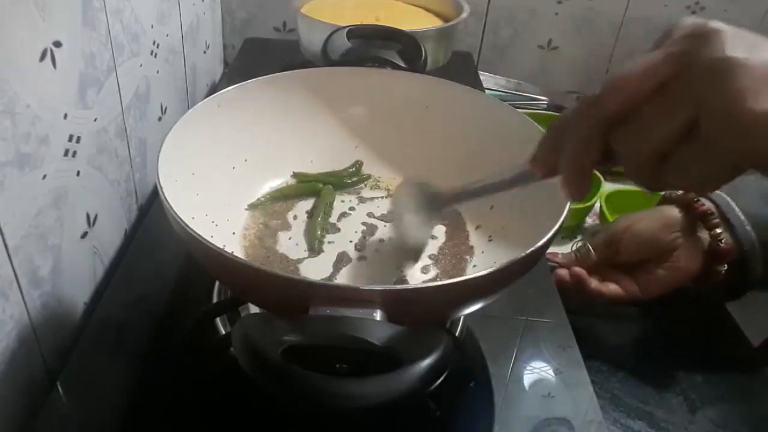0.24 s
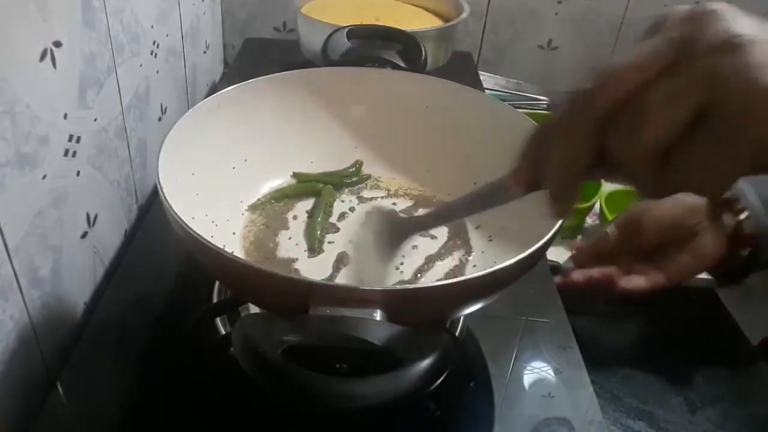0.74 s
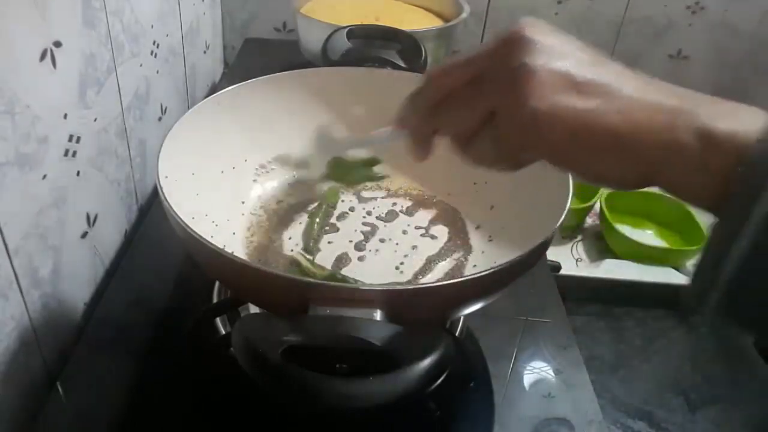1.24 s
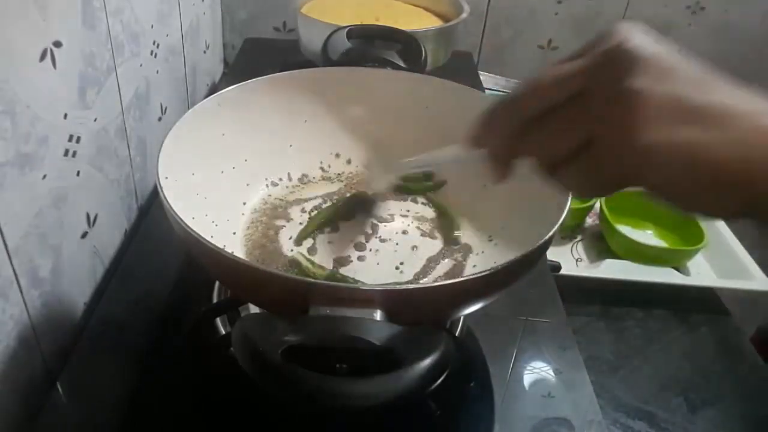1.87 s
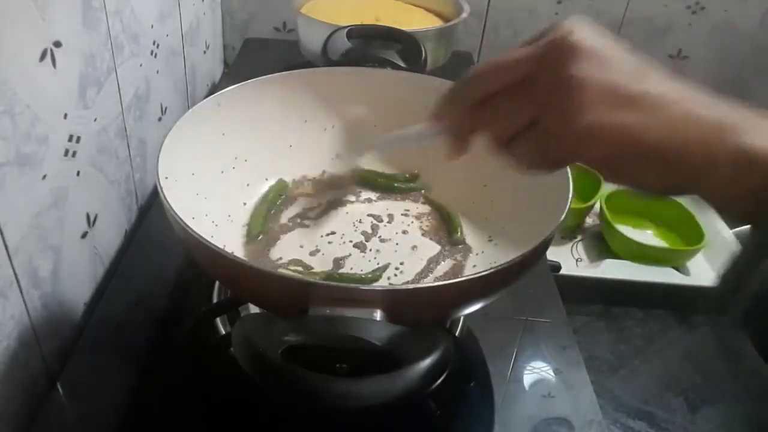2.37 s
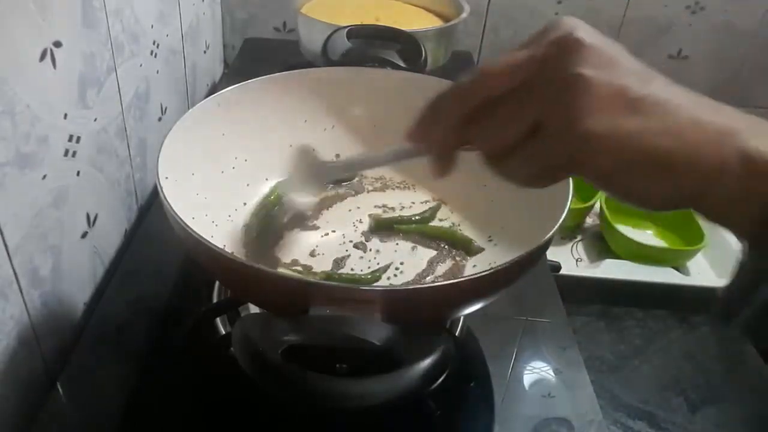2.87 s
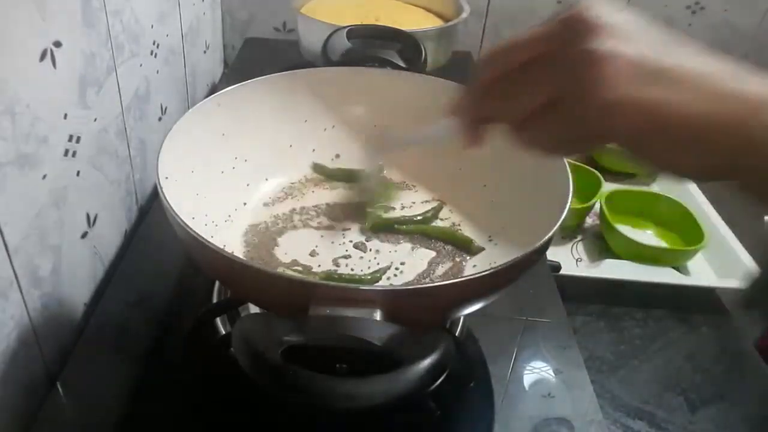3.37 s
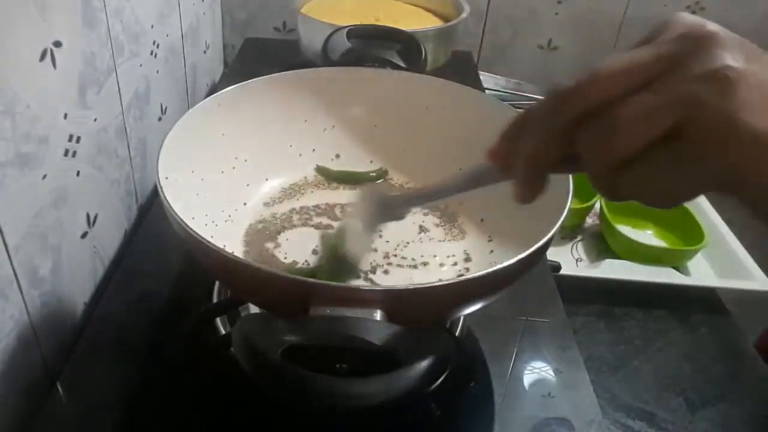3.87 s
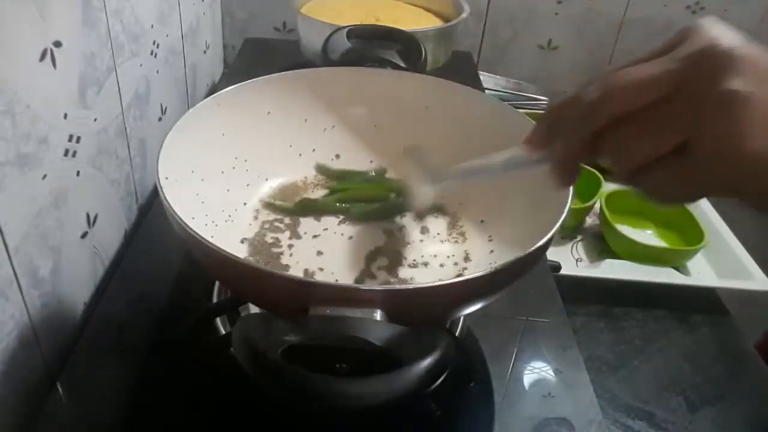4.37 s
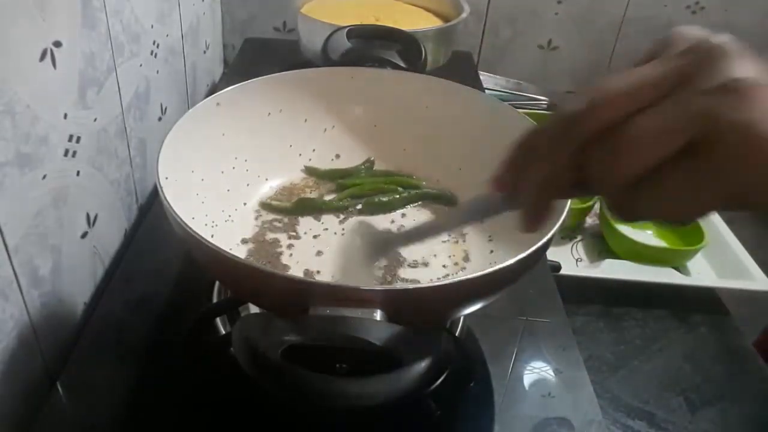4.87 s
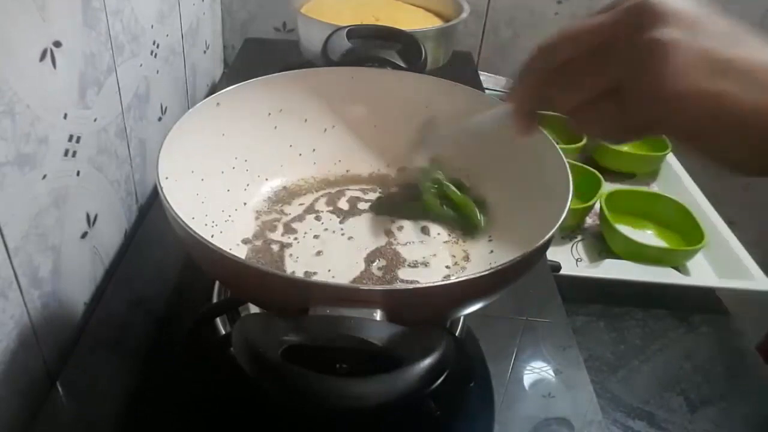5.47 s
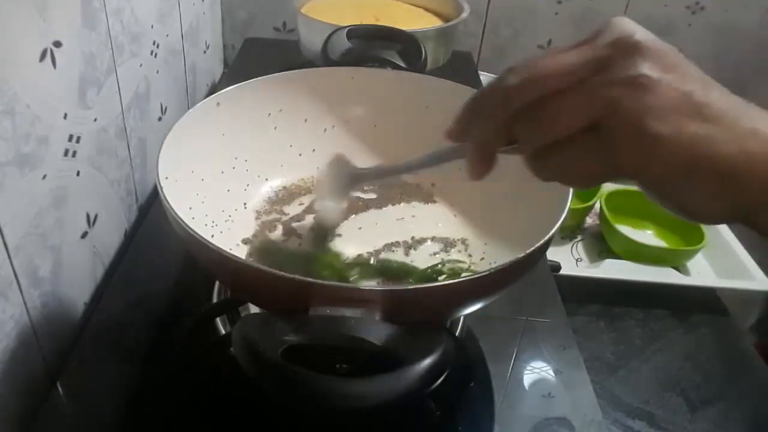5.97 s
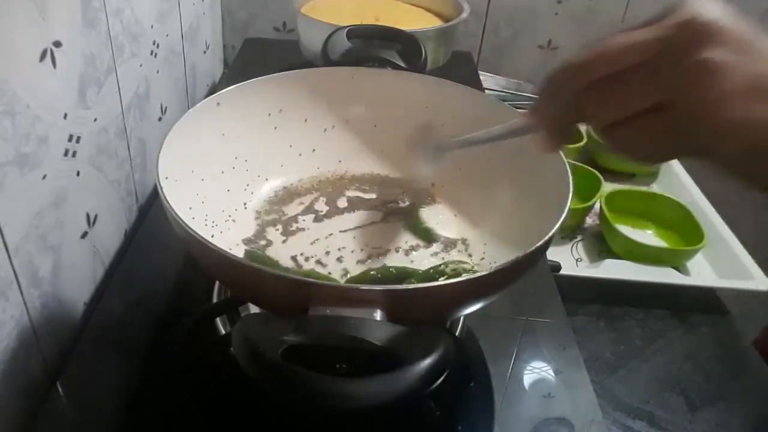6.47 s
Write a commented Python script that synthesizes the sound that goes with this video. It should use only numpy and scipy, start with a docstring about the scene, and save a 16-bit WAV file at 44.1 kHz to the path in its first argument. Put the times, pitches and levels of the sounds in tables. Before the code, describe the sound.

Close, bright frying fizz with constant snapping pops and wet squelches, broken by metallic ladle taps, gritty scrapes and short ringing slides on a pan.

```python
"""Green chillies and seeds fry in a little hot oil in a deep pan, in a small tiled kitchen.
Many tiny clicks with short echoes make a fine fizz; bursts of noise make separate pops.
Wet chillies squelch as noisy spurts through a resonance, and a few drops spit with a low thud.
A steel ladle knocks on the pan, grinds over the floor and makes the wall sing: dying tones, tapped
or fed by tiny slips. Filtered noise gives the low rush of the stove and the room."""
import sys
import numpy as np
from scipy import signal
from scipy.io import wavfile

SR = 44100
rng = np.random.default_rng(int(sys.argv[2]) if len(sys.argv) > 2 else 0)


def dump(signal):
    """Clip the signal to [-1, 1] and save it as 16-bit WAV at the path in sys.argv[1]."""
    limited = np.clip(np.atleast_2d(signal).T, -1, 1)
    pcm = np.round(limited * 32767).astype(np.int16)
    wavfile.write(sys.argv[1], SR, pcm)


N = 297234  # length in samples

# The tones at which the pan can ring. Each row: pitch in Hz, time to die by 60 dB in s,
# relative level in dB when touched on the floor, relative level in dB when rubbed on the wall.
PAN_MODES = [(239.5, 0.44, -16, -31.5), (372.8, 0.39, -15, -34), (401, 0.029, -2, -53),
             (501, 0.23, -12.5, -45), (580, 0.18, -2, -45), (660, 0.028, -2, -48), (729, 0.14, 3, -17.5),
             (790.2, 0.18, -2.5, 0.5), (826, 0.034, -29, -12), (893.6, 0.045, -31, -20),
             (999, 0.19, -7, -31.5), (1128, 0.12, -8, -23), (1264, 0.074, 5.5, -12),
             (1375.5, 0.14, -5.5, -10.5), (1454, 0.049, 2, -18), (1669, 0.21, -4, -34),
             (1780, 0.088, -15, -29), (1994, 0.029, 13, -9.5), (2253, 0.058, 5, -13), (2780, 0.057, 6, -13),
             (3677, 0.028, 13, -15.5)]


def amp(db):
    """Turns decibels into a gain."""
    return 10 ** (np.asarray(db) / 20)


def evened(x):
    """Scales a sound to an rms of 1."""
    return x / np.sqrt(np.mean(x ** 2) + 1e-20)


def struck(x, size=440):
    """Scales a blow so that its first 10 ms have an rms of 1."""
    return x / np.sqrt(np.mean(x[:size] ** 2) + 1e-20)


def add(mix, s, sound):
    """Mixes a sound in at time s, in seconds."""
    part = mix[max(round(s * SR), 0):][:len(sound)]
    part += sound[:len(part)]


def colour(x, points, size=2048):
    """Filters a sound to a spectrum without pre-echo; white noise keeps its power."""
    hz, db = np.transpose(points)
    bin_hz = abs(np.fft.fftfreq(size, 1 / SR))
    gain_db = np.interp(np.log(bin_hz + 1), np.log(hz), db)
    log_gain = np.log(amp(gain_db))
    # minimum phase: the filter responds as early as it can
    taps = np.fft.ifft(np.exp(np.conj(signal.hilbert(log_gain)))).real
    return signal.oaconvolve(x, taps / np.linalg.norm(taps))[:len(x)]


def two_bands(body, fine, split_hz=8200):
    """Joins the lower band of one sound to the upper band of another, in phase."""
    low = signal.butter(2, split_hz, "low", fs=SR, output="sos")
    high = signal.butter(2, split_hz, "high", fs=SR, output="sos")
    # each filter runs twice, so that the two bands join in phase
    lower = signal.sosfilt(np.vstack([low, low]), body)
    upper = signal.sosfilt(np.vstack([high, high]), fine)
    return lower + upper


def grains(n, per_s, spread_db):
    """Makes random clicks of either sign, most of them small and a few large."""
    size = amp(spread_db * np.minimum(rng.exponential(1, n), 4))
    sign = rng.choice([-1., 1.], n)
    happens = rng.random(n) < per_s / SR
    return size * sign * happens


def burst(crack_s, echo_db, t60, size=9000):
    """A crack of noise, then its dense echoes from the pan wall and the tiles."""
    t = np.arange(size) / SR
    crack = rng.standard_normal(size) * np.exp(-t / crack_s)
    build_up = 1 - np.exp(-t / 0.00036)
    echoes = grains(size, 14000, 2.04) * amp(-60 * t / t60) * build_up
    return crack / np.linalg.norm(crack) + amp(echo_db) * echoes / np.linalg.norm(echoes)


def ring(hz, t60, db, size=13000):
    """The sum of dying modes after one tap; they radiate almost nothing below their own pitch."""
    t = np.arange(size) / SR
    total = np.zeros(size)
    for f, life, level in zip(hz, t60, db):
        sign = rng.choice([-1, 1])
        total += sign * amp(level - 60 * t / life) * np.cos(2 * np.pi * f * t)
    total[0] *= .5  # a halved first sample keeps the bass low
    return total


def boil(at_s):
    """How hard the oil boils: levels of sizzle and fine fizz in dB at the given times."""
    # Each row: time in seconds, relative level in dB of the wet chillies' sizzle,
    # relative level in dB of the seeds' fine fizz.
    boil_levels = [(0.0, -32, -41), (0.15, -34, -41.5), (0.34, -33, -34.5), (0.49, -35, -38.5),
                   (1.05, -35, -40), (1.57, -35, -38.5), (2.25, -31, -35.5), (2.7, -33, -41.5),
                   (3.62, -31, -34.5), (3.7, -34.5, -35), (4.52, -30.5, -36.5), (5.13, -36.5, -40.5),
                   (5.48, -32.5, -40.5), (6.01, -33, -42.5), (6.27, -28, -32.5), (6.74, -33.5, -39)]
    s, *levels = np.transpose(boil_levels)
    return [np.interp(at_s, s, level) for level in levels]


def fizz(tilt_db=3):
    """Countless tiny bubbles burst all over the oil, each place with its own echoes and brightness."""
    # Colour of the fizz. Each row: frequency in Hz, relative level in dB.
    fizz_spectrum = [(100, -54), (400, -28), (1000, -14.5), (2000, -8.5), (2800, -7), (3600, -1.5),
                     (5500, 1), (7500, 5), (8600, -7), (10000, -1), (12000, 3), (15500, 2.5)]
    bubbles = np.zeros(N)
    for bright in np.linspace(-1, 1, 14):
        tilt = [(2500, -tilt_db * bright), (6000, 0.0074), (12000, tilt_db * bright)]
        echoes = colour(burst(0.00021, 3.1, 0.13), tilt)
        bubbles += signal.oaconvolve(grains(N, 45, 3.6), echoes)[:N]
    bubbles = evened(bubbles)
    body_db, fine_db = boil(np.arange(N) / SR)
    sizzle = amp(body_db + 5.0) * bubbles
    fine_fizz = amp(fine_db + 2.6) * bubbles
    return colour(two_bands(sizzle, fine_fizz), fizz_spectrum)


def burner():
    """The low steady rush of the stove and the room, as filtered noise."""
    # Colour of the rush. Each row: frequency in Hz, relative level in dB.
    rush_spectrum = [(20, -26), (45, -4), (60, 11), (78, -1.5), (102, 12.5), (135, -5), (200, 2),
                     (300, -2.5), (600, 4), (2000, -11)]
    return amp(-59) * colour(rng.standard_normal(N), rush_spectrum, size=8192)


def small_pops(per_s=12, fine_rise_db=20, body_rise_db=4, spread_db=5):
    """Small pops come by chance, one in each slot of time; their levels follow the boil."""
    slots = np.arange(0, N / SR, 1 / per_s)
    late, fine, body = rng.random((len(slots), 3)).T
    s = slots + late / per_s
    body_db, fine_db = boil(s)
    fine_db = fine_db + fine_rise_db + spread_db * (fine - .5)
    body_db = body_db + body_rise_db + spread_db * (2 * body - 1)
    return list(zip(s, fine_db, body_db))


def pops(rise_s=0.00056):
    """Larger pockets of steam burst, each with a treble snap and a fuller puff below it."""
    # The loudest bursts of steam in the oil. Each row: start in seconds,
    # relative level of the treble in dB, relative level of the body below it in dB.
    loud_pops = [(0.0835, -14, -27.5), (0.1778, -9, -24), (0.2934, -13, -23.5), (0.412, -11, -22.5),
                 (0.4513, -11, -22.5), (0.48, -9.5, -22.5), (0.594, -14, -32), (0.6983, -14, -26),
                 (0.7901, -9.5, -22), (0.9535, -8.5, -27), (1.0042, -13, -24), (1.1829, -14, -17.5),
                 (1.2872, -13.5, -32), (1.3845, -12.5, -26), (1.6407, -12.5, -25.5), (1.7482, -12, -26),
                 (1.8784, -10.5, -23), (2.0987, -11, -25.5), (2.3022, -7.5, -29), (2.383, -11, -33),
                 (2.4572, -14, -33), (2.693, -11.5, -24), (3.01, -12.5, -29), (3.1994, -12, -23),
                 (3.245, -14, -23.5), (3.318, -15, -24.5), (3.5665, -9.5, -25), (3.789, -13, -22),
                 (3.833, -11, -25.5), (3.9318, -10, -21.5), (3.9896, -11, -28), (4.1863, -13, -18.5),
                 (4.4803, -7.5, -21.5), (4.6028, -14, -11), (4.7192, -11, -13), (4.8265, -17, -23),
                 (4.904, -15, -23), (5.127, -13.5, -24), (5.2738, -13.5, -22.5), (5.4234, -12.5, -25.5),
                 (6.115, -10.5, -15), (6.1821, -12, -21.5), (6.4588, -14, -23.5), (6.634, -12, -34)]
    # Colour of the pops. Each row: frequency in Hz, relative level in dB.
    pop_spectrum = [(100, -40), (500, -14.5), (1200, -12), (2200, -9.5), (3800, 1), (6000, 3), (7400, 8),
                    (8600, -2), (10000, 2), (12000, 6), (15500, 3)]
    fine, body = np.zeros((2, N))
    for s, fine_db, body_db in list(loud_pops) + small_pops():
        # the film snaps at once; the pocket behind it empties a little more slowly
        snap = burst(.0006, 3.5, .15)
        puff = burst(0.0018, 3.4, 0.14)
        puff = puff * (1 - np.exp(-np.arange(len(puff)) / SR / rise_s))
        add(fine, s, amp(fine_db - 10.7) * struck(snap))
        add(body, s, amp(body_db + 2.0) * struck(puff))
    return colour(two_bands(body, fine), pop_spectrum)


def squelch(hz, life_s=0.013):
    """A short spurt of steam rings a small wet cavity."""
    t = np.arange(3500) / SR
    onset = 1 - np.exp(-t / 0.00074)
    spurt = grains(len(t), 9000, 4.7) * np.exp(-t / life_s) * onset
    cavity = signal.iirpeak(hz, 4.5, SR)  # a broad resonance, Q of 4.5
    return struck(signal.lfilter(*cavity, np.diff(spurt, prepend=0)))


def squelches(count=110, small_db=-39):
    """Wet chillies vent steam through cavities: big squelches, and many small ones by chance."""
    # The big squelches. Each row: start in seconds, pitch of the cavity in Hz, level in dB.
    big_squelches = [(0.143, 2760, -29), (.207, 3160, -31), (.233, 2800, -26.5), (1.185, 4260, -28),
                     (2.602, 6500, -27), (2.895, 6060, -26.5), (3.175, 4270, -29), (4.021, 5060, -31),
                     (5.287, 3900, -26.5), (5.523, 3300, -23.5), (5.539, 2800, -33), (5.907, 3660, -29)]
    out = np.zeros(N)
    for s, hz, db in big_squelches:
        add(out, s, amp(db) * squelch(hz))
    for when, pitch, size in rng.random((count, 3)):
        small = squelch(3000 + 4300 * pitch)
        add(out, when * N / SR, amp(small_db + 7 * size) * small)
    return out


def rubbed(modes, hold_s):
    """Tiny slips feed the modes; the steady push of the hand holds their strength."""
    sound = signal.oaconvolve(grains(N, 1500, 3.16), modes)[:N]
    window = signal.windows.hann(int(hold_s * SR))
    power = abs(signal.oaconvolve(sound ** 2, window / window.sum(), "same"))
    return sound / np.sqrt(power + 1e-9)


def stroke(length_s, db, change_db=0, bite_db=0):
    """Strength of one stroke: quick attack, a hold that swells or fades, release as the ladle lifts."""
    attack_s, bite_s, release_db_per_s = .008, 0.021, 217
    t = np.arange(0, length_s + .25, 1 / SR)
    held_db = db + change_db * np.minimum(t / length_s, 1) + bite_db * np.exp(-t / bite_s)
    release_db = release_db_per_s * np.maximum(t - length_s, 0)
    return np.minimum(t / attack_s, 1) * amp(held_db - release_db)


def scrapes(dull_hz=640, catch_db=2.5, bite_db=10.5):
    """Strokes of the ladle grind over the oily floor or make the wall sing, with grit from the seeds."""
    # The ladle slides along the wall. Each row: start in seconds, length in seconds,
    # relative level at the start in dB, change by the end in dB, rasp against the tone in dB before the mix.
    wall_slides = [(0.19, 0.078, -17, -13, -10.5), (0.492, 0.015, -38, -5, -9),
                   (0.605, 0.063, -41, -1.5, -1.5), (1.072, .165, -50, 17.5, -7),
                   (1.287, 0.049, -41, -3, -6), (1.967, .02, -44, -0.5, -7),
                   (2.18, 0.036, -28.5, -5.5, -8.5), (2.284, 0.093, -37.5, 4, -10.5),
                   (2.781, 0.068, -30, 2.5, -8.5), (3.287, 0.065, -32.5, -6, -6.5),
                   (3.784, 0.018, -35.5, -7, 0), (4.276, 0.016, -23, -8, -7.5), (4.81, 0.088, -42, 0, -2),
                   (5.049, 0.24, -33.5, -5.5, -7), (5.879, 0.069, -33.5, -2.5, -4),
                   (6.321, 0.097, -14.5, -15.5, -9.5)]
    # The ladle grinds over the floor. Each row: start in seconds, length in seconds, relative level in dB.
    floor_grinds = [(.497, 0.17, -42), (0.934, 0.39, -46), (2.185, 0.16, -46), (2.6, 0.16, -38),
                    (3.178, 0.14, -40), (3.624, 0.27, -42), (4.12, 0.083, -41), (4.624, 0.051, -37.5),
                    (4.767, 0.056, -42), (5.04, 0.17, -47), (5.681, 0.31, -43.5)]
    # Colour of the seeds' grit. Each row: frequency in Hz, relative level in dB.
    grit_spectrum = [(80, -48), (300, -25), (700, -7), (1300, 9), (2200, 1.5), (3200, 6), (4500, 6.5),
                     (9000, -27)]
    hz, t60, floor_db, wall_db = np.transpose(PAN_MODES)
    # the chattering ladle locks on to the wall's strongest mode and its close neighbours
    locked = abs(hz - 790) < 110
    tone = rubbed(ring(hz[locked], t60[locked], wall_db[locked]), .028)
    rasp = rubbed(ring(hz[~locked], t60[~locked], wall_db[~locked]), 0.045)
    grit = evened(colour(grains(N, 1100, 5.2), grit_spectrum))
    rasp = rasp + amp(-3.5) * grit
    # the oil film softens the slips on the floor, so the high modes stay weak
    soft_db = 10 * np.log10(1 + (hz / dull_hz) ** 6)
    floor = rubbed(ring(hz, t60, floor_db - soft_db), 0.046)
    # the ladle catches and slips unevenly, some twenty times a second
    catch_band = signal.butter(2, [14, 40], "band", fs=SR, output="sos")
    catch = signal.sosfilt(catch_band, rng.standard_normal(N))
    sing, scratch, grind = np.zeros((3, N))
    for s, length_s, db, change_db, rasp_db in wall_slides:
        add(sing, s, stroke(length_s, db, change_db))
        add(scratch, s, stroke(length_s, db + rasp_db, change_db))
    for s, length_s, db in floor_grinds:
        # on the floor the ladle bites harder at first
        add(grind, s, stroke(length_s, db, bite_db=bite_db))
    strokes = amp(-2.5) * sing * tone + scratch * rasp + amp(-6.5) * grind * floor
    return amp(catch_db * evened(catch)) * strokes


def knocks(contact_s=0.00053):
    """The ladle lands and chatters; food caught under it softens the blow and dulls the ring."""
    # The ladle meets the pan. Each row: start in seconds, ring of the pan in dB,
    # relative clatter of the steel in dB, hardness as the top of the ring in Hz,
    # place from 0 (floor) to 1 (wall).
    ladle_hits = [(.296, -27, -31, 4000, 0.03), (.497, -31, -28.5, 3000, 0.84),
                  (.936, -40, -38, 800, 0.087), (2.603, -26, -29.5, 3380, 0.2), (3.172, -33.5, -35, 700, 0),
                  (3.626, -20.5, -19, 3500, 0), (3.867, -31.5, -29, 3000, 0.092),
                  (4.127, -28.5, -29.5, 890, 0.01), (4.622, -30.5, -25, 4000, 0.05),
                  (4.763, -29.5, -44, 1490, 0), (5.683, -22.5, -22.5, 3470, 0),
                  (6.3185, -14, -27, 3000, 0.85), (6.690, -18.5, -15.5, 4060, 0.021),
                  (6.699, -21.5, -23, 3970, 0)]
    # The tones of the ladle. Each row: pitch in Hz, time to die by 60 dB in s, relative level in dB.
    ladle_modes = [(4160, .08, -7), (4856, .07, -8), (5450, .04, -4), (6370, .06, -5), (6680, .06, -2),
                   (6950, .06, -3), (7240, .05, 0), (7645, .07, 0), (10900, .04, -9)]
    # Colour of the clatter. Each row: frequency in Hz, relative level in dB.
    clatter_spectrum = [(40, -44), (120, -34), (300, -36), (600, 4.5), (1500, -2), (2300, 5), (4500, 1),
                        (6000, 1), (7400, 7.5), (8700, -8.5), (11500, 3), (15500, -9.5)]
    out = np.zeros(N)
    hz, t60, floor_db, wall_db = np.transpose(PAN_MODES)
    for s, ring_db, clatter_db, hard_hz, place in ladle_hits:
        blow = burst(0.0021, 5, 0.19)
        blow = blow * (1 - np.exp(-np.arange(len(blow)) / SR / contact_s))
        place_db = floor_db + place * (wall_db - floor_db)
        soft_db = 10 * np.log10(1 + (hz / hard_hz) ** 4)
        modes = ring(hz, t60, place_db - soft_db)
        # one clean tap, then the noisy chatter of the blow
        chatter = np.r_[1, amp(-7) * blow[1:] / np.linalg.norm(blow)]
        pan = signal.fftconvolve(modes, chatter)
        ladle = signal.fftconvolve(ring(*np.transpose(ladle_modes)), burst(0.00023, -0.5, 0.052))
        add(out, s, amp(ring_db) * struck(pan))
        add(out, s, amp(clatter_db) * struck(ladle))
        add(out, s, amp(clatter_db + 0.9) * struck(colour(blow, clatter_spectrum)))
    return out


def spits(push_s=0.00022, thud_hz=105):
    """Drops of oil spit far out: a sharp push of pressure with a short low thud behind it."""
    # Each row: start in seconds, level of the push in dB, level of the thud against the push in dB.
    oil_drops = [(.790, -7.5, -29), (1.384, -17, -23), (4.6035, -26.5, -7.5), (4.719, -19, -14)]
    out, t = np.zeros(N), np.arange(4000) / SR
    push = (1 - t / push_s) * np.exp(-t / push_s)
    thud = np.sin(2 * np.pi * thud_hz * t) * np.exp(-t / 0.0037)
    for s, db, thud_db in oil_drops:
        add(out, s, amp(db) * (push - amp(thud_db) * thud))
    return out


def scene():
    """Adds up all the sources in one channel, as heard from just above the stove."""
    frying = fizz() + pops() + squelches() + spits()
    stirring = knocks() + scrapes()
    return (frying + stirring + burner())[None]


def record(dry, edge_hz=15900):
    """The microphone's bass roll-off and the recorder's band limit."""
    bass_cut = signal.butter(2, 45, "high", fs=SR, output="sos")
    thin = signal.sosfilt(bass_cut, dry)
    treble_cut = signal.firwin(401, edge_hz, window=("kaiser", 9), fs=SR)
    return signal.oaconvolve(thin, treble_cut[None], "same")


dry = scene()
out = record(dry)
dump(out)
```